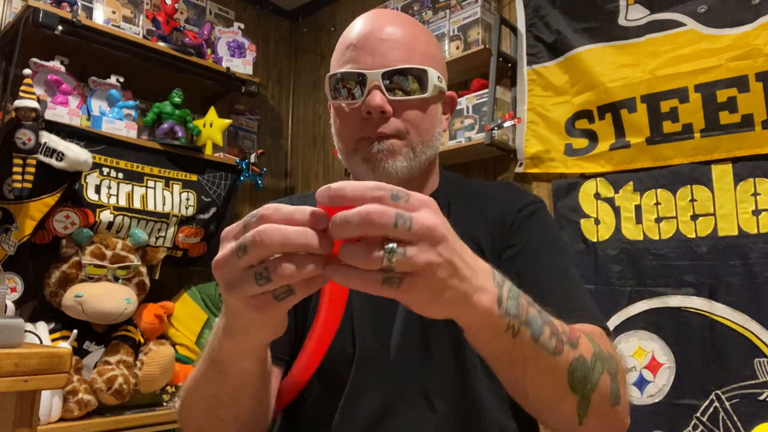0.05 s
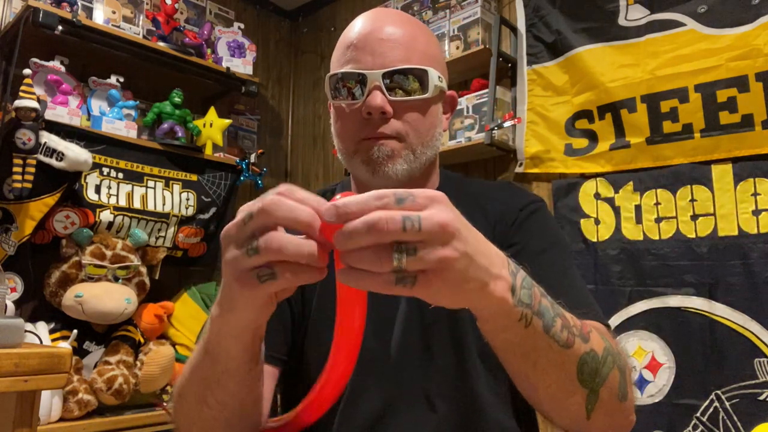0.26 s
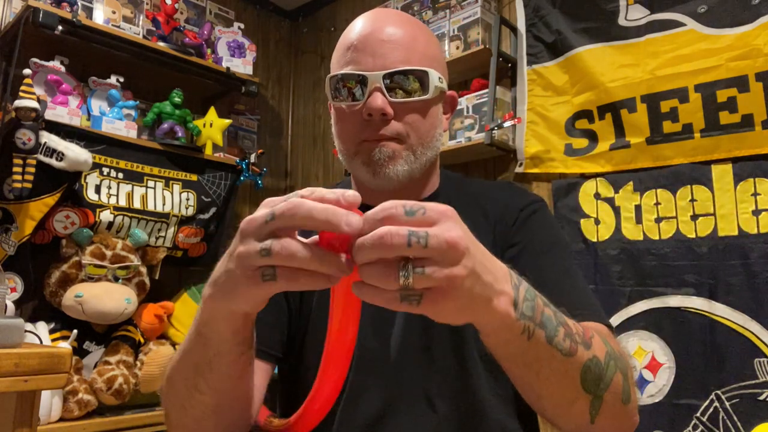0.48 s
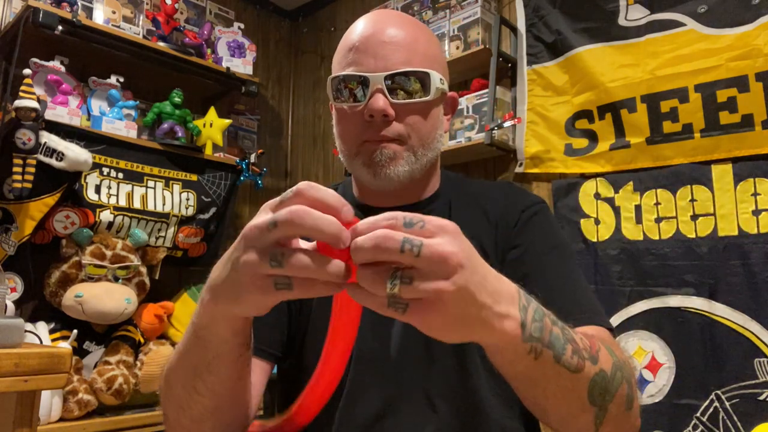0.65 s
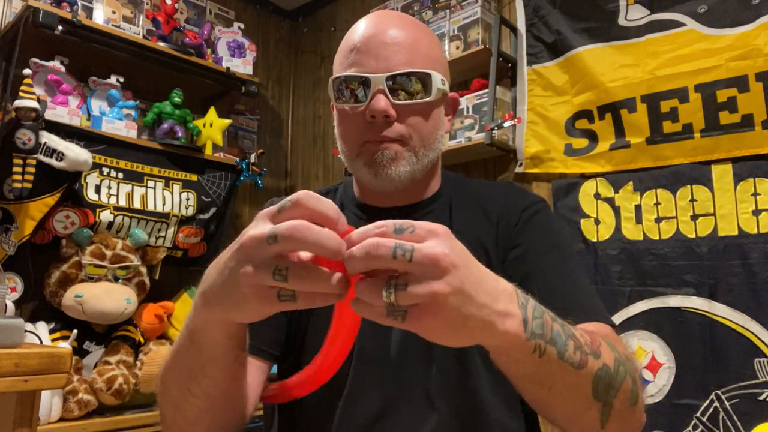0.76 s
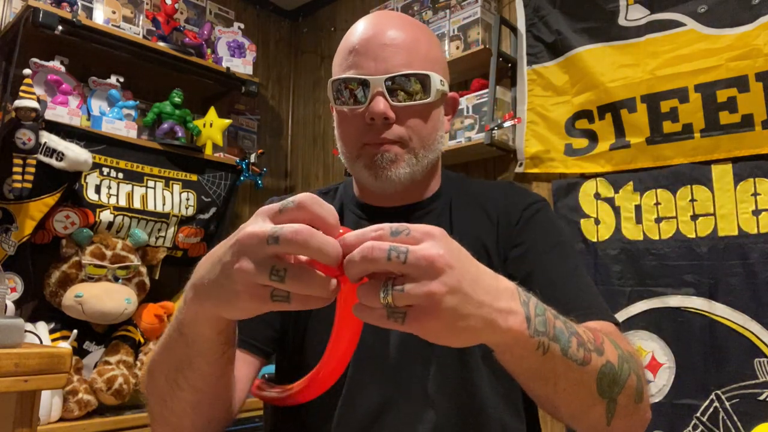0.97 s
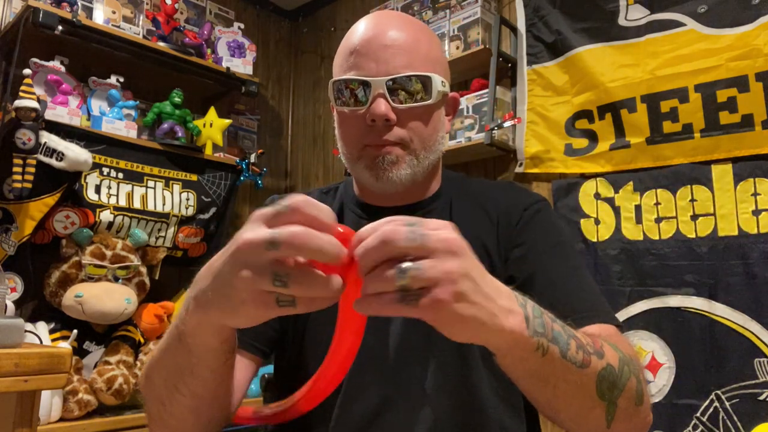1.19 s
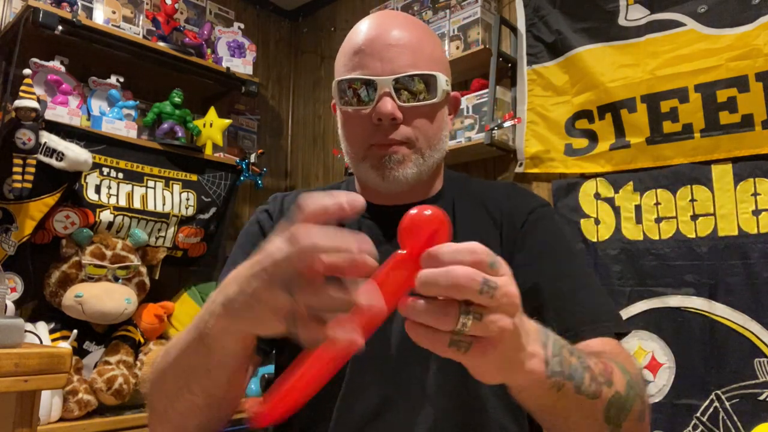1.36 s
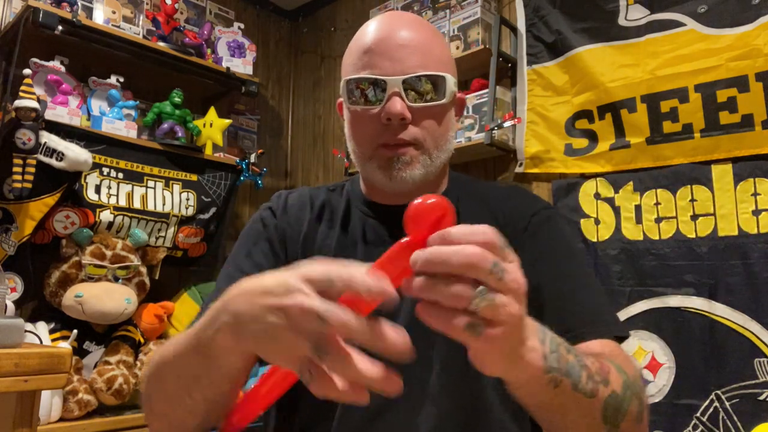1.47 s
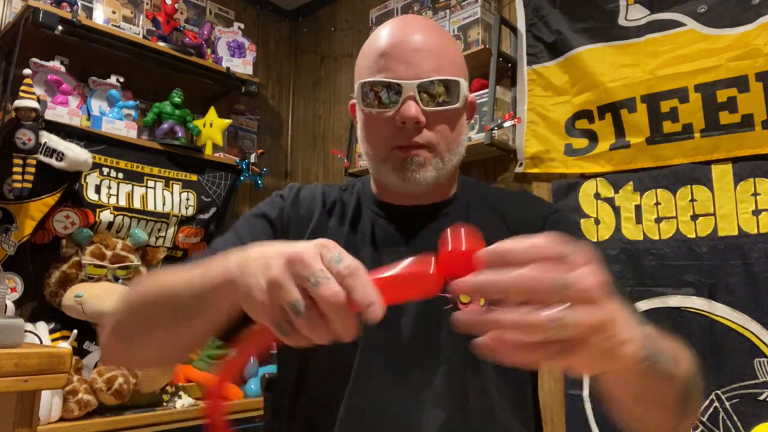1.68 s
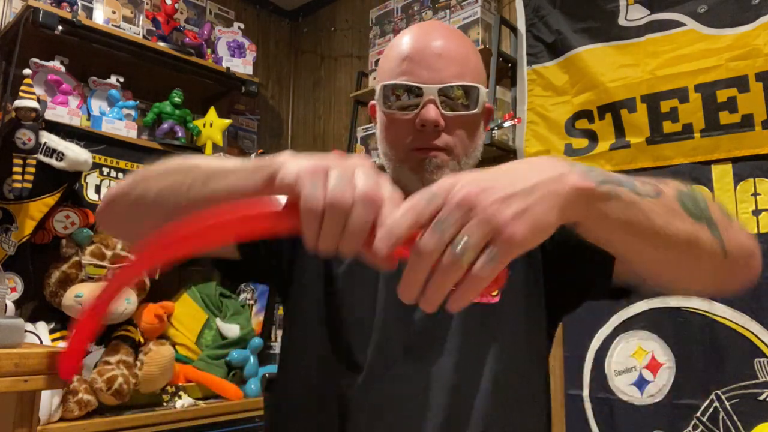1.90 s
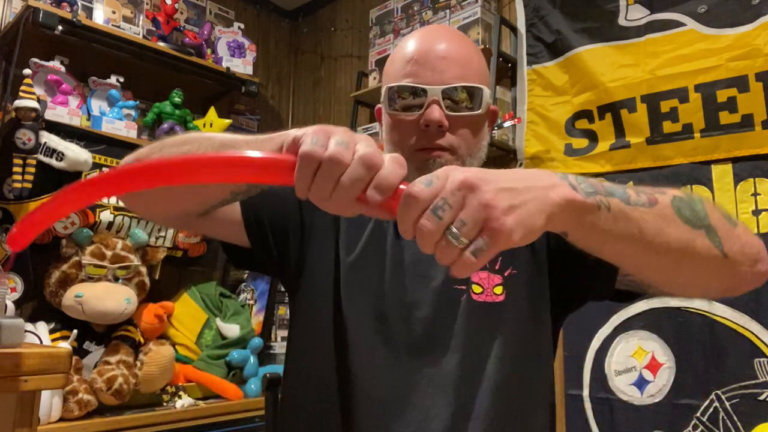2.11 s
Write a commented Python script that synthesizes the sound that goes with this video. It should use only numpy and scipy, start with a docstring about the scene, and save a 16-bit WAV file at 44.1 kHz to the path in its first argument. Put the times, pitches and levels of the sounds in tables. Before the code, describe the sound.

Balloon twisting: dry rubbery ticks and tiny squeaks, one loud snap, then soft hollow bumps and rubbing

```python
"""Rubber of a long balloon, twisted by fingers, sticks and slips: dry gliding ticks, tiny squeaks, creaks.
The bubble snaps free: scrape, rough squeak of decaying partials, hollow thump of decaying sines.
Hands bump the tube (noise puff, hollow note, ringing modes), palms and fingertips slide and rub (grainy noise).
Small, quiet room: short echo of decaying noise, low rumble, faint hum; picked up by two microphone ports."""
import sys
import numpy as np
from scipy import signal
from scipy.fft import rfft, irfft, next_fast_len
from scipy.io import wavfile
from scipy.ndimage import map_coordinates

SR = 44100
rng = np.random.default_rng(int(sys.argv[2]) if len(sys.argv) > 2 else 0)


def unload_wav(signal):
    """Save mono or channel-first audio to the path in sys.argv[1] as 16-bit WAV at rate SR, clipped to [-1, 1]."""
    wavfile.write(
        sys.argv[1],
        SR,
        np.round(np.clip(np.atleast_2d(signal).T, -1, 1) * 32767).astype(np.int16),
    )


N = 94506


def amp(db):
    """Decibels to gain."""
    return 10 ** (np.asarray(db) / 20)


def unit(x):
    """Scale to rms 1."""
    return x / np.sqrt(np.mean(x ** 2) + 1e-20)


def along(points, hz):
    """Interpolate (frequency [Hz], value) points on a log-frequency axis."""
    point_hz, value = np.transpose(points)
    return np.interp(np.log(hz + 1), np.log(point_hz + 1), value)


def clock():
    """Time of each sample [s]."""
    return np.arange(N) / SR


def wobble(knots_per_s):
    """Smooth random curve: spline through normal random knots."""
    return map_coordinates(rng.standard_normal(N // 4), [clock() * knots_per_s], mode="wrap")


def filtered(x, response):
    """Multiply the spectrum of x by a complex response of frequency."""
    size = next_fast_len(N + SR // 2)
    return irfft(rfft(x, size) * response(np.fft.rfftfreq(size, 1 / SR)), size)[..., :N]


def noise(colour, tilt_db=0, size=N):
    """Random-phase noise of rms 1 with a colour and a tilt per octave."""
    hz = np.fft.rfftfreq(size, 1 / SR)
    gain = amp(along(colour, hz) + tilt_db * np.log2(np.maximum(hz, 100)))
    return unit(irfft(gain * np.exp(2j * np.pi * rng.random(len(hz))), size))


def envelope(t, attack_s, hold_s, t60_s):
    """Linear rise from t = 0, hold until hold_s, then exponential decay."""
    rise = np.clip(t / attack_s, 0, 1)
    return rise * np.exp(-np.log(1000) * np.maximum(t - hold_s, 0) / t60_s)


def add(track, start_s, sound):
    """Mix a sound into a track at a time."""
    part = track[max(round(start_s * SR), 0):][:len(sound)]
    part += sound[:len(part)]


# rumble colour: (frequency [Hz], level [dB])
RUMBLE_COLOUR = [(20, -11), (45, 0), (80, -1.5), (115, 0), (165, -14.5), (300, -20), (450, -14.5),
                 (650, -22), (1000, -19), (2000, -65)]
RUMBLE_DB, RUMBLE_WIDTH_DB = -52, -5.5
HUM_HZ, HUM_DB, HUM_SWING_DB = 117.8, -58.5, 4.9


def background():
    """Low room rumble, partly opposed between the ports, and a faint hum of drifting level."""
    opposed = np.array([[1], [-1]]) * noise(RUMBLE_COLOUR)
    rumble = noise(RUMBLE_COLOUR) + amp(RUMBLE_WIDTH_DB) * opposed
    hum = amp(HUM_DB + HUM_SWING_DB * wobble(6.1)) * np.sin(2 * np.pi * HUM_HZ * clock())
    return amp(RUMBLE_DB) * rumble + hum


# room decay: (frequency [Hz], t60 [s])
ROOM_T60 = [(100, 0.16), (500, 0.21), (2000, 0.19), (8000, 0.13), (15000, 0.025)]
ROOM_WIDTH_DB = 1  # opposed part of the tail re. common part
ROOM_SPANS, TAIL_RISE_S = 7, 0.0018


def room(x):
    """Decaying-noise tail, partly alike at both ports, drawn afresh for each of a few equal time spans."""
    out = np.zeros((2, N))
    for span in np.array_split(np.arange(N), ROOM_SPANS):
        hz, t, bins = signal.stft(rng.standard_normal((2, SR // 3)), SR, nperseg=256)
        decay = np.exp(-np.log(1000) * t / along(ROOM_T60, hz)[:, None])
        tail = signal.istft(bins * decay, SR, nperseg=256)[1]
        tail = tail * np.clip(np.arange(tail.shape[1]) / SR / TAIL_RISE_S, 0, 1)
        mid, side = tail / np.linalg.norm(tail[0])
        for track, sign in zip(out, (1, -1)):
            port_tail = mid + sign * amp(ROOM_WIDTH_DB) * side
            add(track, span[0] / SR, signal.fftconvolve(x[span], port_tail))
    return out


# palm slides: (time [s], length [s], level [dB])
SLIDES = [(0.552, 0.021, -47.5), (1.259, 0.017, -43), (1.396, 0.073, -41), (1.476, 0.057, -51),
          (1.569, 0.046, -52.5), (1.647, 0.06, -45), (1.891, 0.11, -45), (2.044, 0.038, -47.5)]
# slide colour: (frequency [Hz], level [dB])
SLIDE_COLOUR = [(30, -6), (80, 16), (130, 1.5), (220, -3), (450, 1), (850, 2.5), (1300, -13), (2000, -9.5),
                (4000, -27), (12000, -20)]
SLIDE_FADE_S, SLIDE_GRAIN_DB, SLIDE_GRAINS_PER_S = 0.018, 2.5, 120


def slides():
    """Palms sliding along the tube: dull friction noise of uneven level."""
    t, effort = clock(), np.zeros(N)
    for start_s, length_s, db in SLIDES:
        inside_s = np.minimum(t - start_s, start_s + length_s - t)
        effort += amp(db) * np.clip(inside_s / SLIDE_FADE_S + .5, 0, 1)
    grain = amp(SLIDE_GRAIN_DB * wobble(SLIDE_GRAINS_PER_S))
    return effort * unit(noise(SLIDE_COLOUR) * grain)


# fingertip rubbing: (time [s], relative mids level [dB], relative treble level [dB])
RUB_LEVELS = [(0.0, -49, -43), (0.17, -49, -48.5), (0.36, -50, -46), (0.49, -60.5, -58.5),
              (0.62, -50, -52.5), (0.78, -48, -48), (1.07, -48, -56), (1.2, -47.5, -47.5),
              (1.33, -50.5, -54.5), (1.46, -46, -45.5), (1.54, -52, -51.5), (1.69, -58.5, -58.5),
              (1.92, -45.5, -47.5), (2.05, -46.5, -46.5), (2.14, -43, -48.5)]
# rub colours: (frequency [Hz], level [dB])
RUB_MID_COLOUR = [(300, -11), (900, -7), (1150, -4), (1480, 5.5), (1900, -8), (2700, 3), (4500, -13),
                  (8000, -17)]
RUB_TREBLE_COLOUR = [(1500, -31), (4000, 5), (6000, 8.5), (8200, -0.5), (10500, 0.5), (13000, 0.5),
                     (14500, -3.5), (15500, -24), (16500, -42)]
RUB_MID_GAIN_DB, RUB_TREBLE_GAIN_DB = -6, -6
RUB_GRAIN_DB, RUB_GRAINS_PER_S = 2, 410


def rubbing():
    """Fingertip friction: mid and treble noise sharing one grain."""
    s, mid_db, treble_db = np.transpose(RUB_LEVELS)
    t, grain = clock(), amp(RUB_GRAIN_DB * wobble(RUB_GRAINS_PER_S))
    mid_gain = amp(np.interp(t, s, mid_db) + RUB_MID_GAIN_DB)
    treble_gain = amp(np.interp(t, s, treble_db) + RUB_TREBLE_GAIN_DB)
    mids = mid_gain * unit(noise(RUB_MID_COLOUR) * grain)
    return mids + treble_gain * unit(noise(RUB_TREBLE_COLOUR) * grain)


# knocks on the air-filled tube:
# (time [s], level [dB], relative ring level [dB], hollow note [Hz], relative note level [dB])
BUMPS = [(1.412, -16.5, -2, 374, -6), (1.474, -43, -1, 130, 10.5), (1.497, -43.5, 6, 160, 4),
         (1.551, -39, -4.5, 422, 3), (1.615, -41, -3.5, 536, 0), (1.667, -28, -9, 876, -7),
         (1.68, -39, -6, 373, -2), (1.685, -48.5, -15, 146, 8), (1.8773, -33, -4.5, 350, 2),
         (1.893, -44, 2, 204, 6), (1.924, -35.5, -10, 300, 0), (1.962, -34, -7.5, 853, 1),
         (1.984, -47, -11, 98, 8), (1.998, -40, -6, 460, -1)]
# puff colour: (frequency [Hz], level [dB])
PUFF_COLOUR = [(30, -24), (70, 2), (150, -0.5), (380, 1.5), (600, -5), (950, -2), (1200, -16), (1550, -4.5),
               (2200, -8.5), (2700, -16), (4000, -14.5), (12000, -20)]
# tube ringing: (frequency [Hz], relative level [dB], t60 [s])
TUBE_MODES = [(203.5, -18, 0.13), (387, -3.5, 0.084), (415, -6.5, 0.085), (511, -12.5, 0.124),
              (698, -12.5, 0.18), (808, -14, 0.066), (940, -11, 0.071), (1514, -8.5, 0.028),
              (2000, -3.5, 0.13)]
PUFF_DB, PUFF_HOLD_S, PUFF_T60_S = -1.5, 0.0062, 0.053
PUFF_CENTRE_HZ, FALL_DB_PER_OCTAVE = 304, 2  # fall away from the hollow note
NOTE_RISE_S, NOTE_CYCLES = 0.0015, 13  # note t60 in cycles


def bumps():
    """A knock puffs and rings the tube; where and how softly it lands decides which pitch stands out."""
    out, t = np.zeros(N), np.arange(16384) / SR
    for s, db, ring_db, note_hz, note_db in BUMPS:
        def fall_db(hz):
            """Loss with distance from the hollow note."""
            return FALL_DB_PER_OCTAVE * abs(np.log2(hz / note_hz))

        colour = [(hz, level_db - fall_db(hz)) for hz, level_db in PUFF_COLOUR]
        puff = noise(colour, size=len(t)) * envelope(t, 0.0021, PUFF_HOLD_S, PUFF_T60_S)
        puff *= amp(PUFF_DB - fall_db(PUFF_CENTRE_HZ))
        ring = np.zeros(len(t))
        for hz, level_db, t60_s in TUBE_MODES:
            gain = amp(level_db - fall_db(hz) + rng.normal(0, 1))
            tone = np.sin(2 * np.pi * (hz * t + 0.14 * rng.normal()))
            ring += gain * tone * envelope(t, 0.0023, 0.0036, t60_s)
        note = np.sin(2 * np.pi * note_hz * t)
        note *= envelope(t, NOTE_RISE_S, 2 * NOTE_RISE_S, NOTE_CYCLES / note_hz)
        add(out, s, amp(db) * (puff + amp(note_db) * note + amp(ring_db) * ring))
    return out


# runs of small slips: (time [s], length [s], rate [slips/s], mean level [dB], tilt [dB/octave])
CREAKS = [(0.185, .036, 120, -39.5, 3), (0.409, .018, 147, -40.5, -3.5), (.542, .033, 123, -45, -3.5),
          (0.727, .028, 140, -43.5, 3.5), (0.932, .01, 390, -45.5, -3), (0.981, .006, 434, -40.5, -3),
          (1.12, .031, 185, -39.5, -1), (1.197, .009, 510, -41, -2)]
# creak and scrape colour: (frequency [Hz], level [dB])
CREAK_COLOUR = [(200, -10.5), (700, -22), (1400, 1.5), (4000, 2), (9000, -3), (14000, -7.5)]
CREAK_SCATTER_DB, CREAK_SCATTER_PERIODS = 1.3, .08


def creaks():
    """Rubber creeps on in nearly even little jerks, each a decaying noise burst."""
    out, t = np.zeros(N), np.arange(512) / SR
    for s, length_s, slips_per_s, db, tilt_db in CREAKS:
        for k in range(int(np.ceil(length_s * slips_per_s))):
            late, size = rng.standard_normal(2)
            jerk = noise(CREAK_COLOUR, tilt_db, size=len(t)) * envelope(t, 0.00042, 0.0016, 0.02)
            jerk_s = s + (k + CREAK_SCATTER_PERIODS * late) / slips_per_s
            add(out, jerk_s, amp(db + CREAK_SCATTER_DB * size) * jerk)
    return out


# rough-squeak partials: (frequency before sag [Hz], level [dB], t60 [s])
SKIN_PARTIALS = [(930, -16.5, 0.02), (1519, -17, 0.0085), (1983, -18, 0.036), (2710, -17, 0.016),
                 (3430, -54, 0.048)]
# thump of the freed bubble: (frequency [Hz], level [dB], t60 [s])
THUMP_MODES = [(108, -18, 0.062), (185, -16, 0.028), (350, -12.5, 0.032), (481, -20.5, 0.017)]
SNAP_S, SCRAPE_DB, SCRAPE_TAU_S, SCRAPE_TILT_DB_PER_OCTAVE = 1.4105, -23.5, 0.0046, -0.49
SKIN_LEAD_S, SKIN_SAG_PER_S, SKIN_ROUGHNESS = 0.0024, 3.4, 0.0696
THUMP_RISE_S, THUMP_HOLD_S = 0.0052, 0.0073


def snap():
    """The grip gives way in a swelling scrape, the skin squeaks roughly, the freed bubble thumps."""
    t = clock() - SNAP_S
    scrape = noise(CREAK_COLOUR, SCRAPE_TILT_DB_PER_OCTAVE) * np.exp(-abs(t) / SCRAPE_TAU_S)
    sag = np.exp(-SKIN_SAG_PER_S * np.maximum(t, 0))
    skin, thump = np.zeros(N), np.zeros(N)
    for hz, db, t60_s in SKIN_PARTIALS:
        pitch_hz = hz * sag * (1 + SKIN_ROUGHNESS * wobble(1200))
        tone = np.sin(2 * np.pi * np.cumsum(pitch_hz) / SR)
        skin += amp(db) * tone * envelope(t + SKIN_LEAD_S, 0.004, 0.0059, t60_s)
    for hz, db, t60_s in THUMP_MODES:
        tone = np.sin(2 * np.pi * hz * t)
        thump += amp(db) * tone * envelope(t, THUMP_RISE_S, THUMP_HOLD_S, t60_s)
    return amp(SCRAPE_DB) * scrape + skin + thump


# slips repeating for a few cycles: (time [s], mean pitch at end of hold [Hz], level [dB],
# relative octave level [dB], relative inharmonic overtone level [dB])
SQUEAKS = [(0.2269, 1446, -31.5, 5.5, -0.5), (0.3652, 973, -17.5, -15.5, -9.5),
           (0.853, 1373, -26.5, -3, 1.5), (1.0041, 1610, -25.5, -8.5, -10), (1.864, 1610, -44, -24, -24),
           (1.878, 2020, -39.5, -15, -14), (2.0438, 2000, -35.5, -10, -20)]
SQUEAK_ATTACK_S, SQUEAK_HOLD_S, SQUEAK_T60_S = .0009, 0.0037, 0.012
SQUEAK_SAG_PER_S, SQUEAK_JITTER = 5.6, 0.036
SQUEAK_UPPER_RATIO, SQUEAK_TOP_RATIO, SQUEAK_TOP_DB = 2.48, 3.3, -7  # top re. upper


def squeaks():
    """Stick-slip cycles with octave and two inharmonic overtones; pitch sags as the tension lets go."""
    out, t = np.zeros(N), np.arange(2048) / SR
    for s, hz, db, octave_db, upper_db in SQUEAKS:
        sag = np.exp(-SQUEAK_SAG_PER_S * (t - SQUEAK_HOLD_S))
        pitch_hz = hz * sag * (1 + SQUEAK_JITTER * wobble(830)[:len(t)])
        phase = 2 * np.pi * np.cumsum(pitch_hz) / SR
        upper = np.sin(SQUEAK_UPPER_RATIO * phase) + amp(SQUEAK_TOP_DB) * np.sin(SQUEAK_TOP_RATIO * phase)
        tone = np.sin(phase) + amp(octave_db) * np.sin(2 * phase) + amp(upper_db) * upper
        add(out, s, amp(db) * tone * envelope(t, SQUEAK_ATTACK_S, SQUEAK_HOLD_S, SQUEAK_T60_S))
    return out


# single slips of rubber on skin: (time [s], relative level [dB],
# relative low-mid level [dB], relative upper-mid level [dB], relative treble level [dB])
TICKS = [(0.0281, -29, -41, -13.5, -15), (0.031, -23, -37, -12.5, -11), (0.2266, -13, -16.5, -13.5, -11),
         (0.334, -41.5, -19, -2, -4), (0.3649, -23, -10, -7, -14), (0.393, -20.5, -43, -22, -10.5),
         (0.4227, -32, -26, -24, -8.5), (0.495, -39.5, -34, -42, -10), (0.52, -37.5, -7.5, -40, -11),
         (0.639, -23.5, -27, -21, -11), (0.653, -33.5, -26, -12, -11), (0.6637, -25.5, -38, -18.5, -10),
         (0.786, -28.5, -28, -14, -9.5), (0.8524, -13, -18, -11.5, -10), (1.0037, -20, -15.5, -11, -21.5),
         (1.1007, -17.5, -26, -16.5, -9.5), (1.116, -22.5, -21, -11, -14.5),
         (1.2563, -17.5, -22, -17.5, -13), (1.2706, -24, -14, -14, -13.5), (1.2838, -30, -18, -12, -9.5),
         (1.3755, -36.5, -3.5, -9, -8.5), (1.4094, -4, -16, -15, -13), (1.6527, -30.5, -14, -10, -7.5),
         (1.6671, -17.5, -14.5, -14, -10.5), (2.0433, -20.5, -14, -10.5, -13)]
TICK_GAIN_DB, TICK_BASS_DB = 21, -12.5
TICK_SHAKE_DB, TICK_SHAKE_T60_S = 2.5, 0.014
TICK_GLIDE_S, TICK_GLIDE_HZ = 0.002965, 4360  # delay of the lows; its decay constant over frequency
TICK_LEAD_SAMPLES = 24


def ticks():
    """A slip cracks along the taut skin; highs arrive first, so it glides down in milliseconds."""
    out, t = np.zeros(N), np.arange(1024) / SR
    hz = np.fft.rfftfreq(len(t), 1 / SR)
    delay_s = TICK_GLIDE_S * np.exp(-hz / TICK_GLIDE_HZ)
    glide = np.exp(-2j * np.pi * np.cumsum(delay_s) * hz[1])  # phase = integral of group delay
    for s, db, low, mid, top in TICKS:
        bass = low + TICK_BASS_DB
        colour = [(150, bass), (650, bass + 0.5), (1050, low - 1), (1700, low),
                  (2200, mid - 8), (2800, mid - 3), (5000, mid - 6),
                  (6500, top - 10), (8200, top - 6), (10500, top - 9), (14000, top - 9), (16000, top - 17)]
        shake = rng.standard_normal(len(t)) * np.exp(-np.log(1000) * t / TICK_SHAKE_T60_S)
        slip = 1 + amp(TICK_SHAKE_DB) * rfft(shake / np.linalg.norm(shake))  # impulse + shake
        crack = np.roll(irfft(slip * glide * amp(along(colour, hz))), TICK_LEAD_SAMPLES)
        gain = amp(db + TICK_GAIN_DB) * np.linalg.norm(amp([low, mid, top]))
        add(out, s, gain * crack / np.linalg.norm(crack))
    return out


SLIP_ROOM_DB, SQUEAK_ROOM_DB, BUMP_ROOM_DB = -9.5, -20, -12.5  # sends to the room


def scene():
    """The balloon close by, in its room."""
    slips, chirps, knocks = ticks() + creaks(), squeaks(), bumps() + snap()
    send = amp(SLIP_ROOM_DB) * slips + amp(SQUEAK_ROOM_DB) * chirps + amp(BUMP_ROOM_DB) * knocks
    friction = rubbing() + slides()
    return slips + chirps + knocks + friction + room(send) + background()


# port phase: (frequency [Hz], lead of left over right [rad])
PORT_PHASE = [(100, .1), (330, .1), (500, -.5), (900, -.7), (1120, -1.5), (1250, -.3), (1550, -.3),
              (1800, -1), (2000, -.6), (2600, -1.7), (3300, -1.1), (4400, -1.1), (4900, -2.4), (6000, -2.5),
              (7300, -.5), (8800, 1), (10400, 3.1), (12600, 6.2), (13600, 6.7), (15200, 9.3)]
# port balance: (frequency [Hz], left minus right [dB])
PORT_BALANCE = [(50, 0), (110, 0), (150, -7), (210, -9), (270, -1), (420, 2), (520, -3), (1000, 0),
                (1350, -3), (1900, 1), (2600, -1.5), (4000, 0)]
LOW_CUT_HZ, ROLL_OFF_HZ, TOP_HZ = 45, 15300, 16500


def record(dry):
    """Two microphone ports differ in phase and level; lowest bass and top roll off."""
    half = np.array([[.5], [-.5]])  # half the difference to each port

    def response(hz):
        """Complex response of both ports."""
        low_cut = (1j * hz / (1j * hz + LOW_CUT_HZ)) ** 2
        top_cut = (hz < TOP_HZ) / np.sqrt(1 + (hz / ROLL_OFF_HZ) ** 40)
        phase = np.exp(1j * half * along(PORT_PHASE, hz))
        return phase * amp(half * along(PORT_BALANCE, hz)) * low_cut * top_cut

    return filtered(dry, response)


dry = scene()
out = record(dry)
unload_wav(out)
```